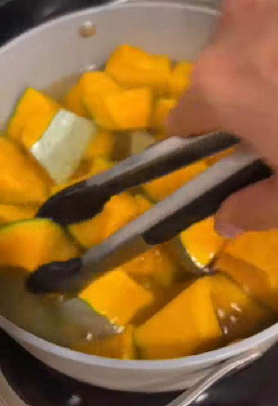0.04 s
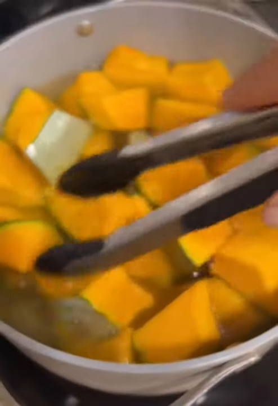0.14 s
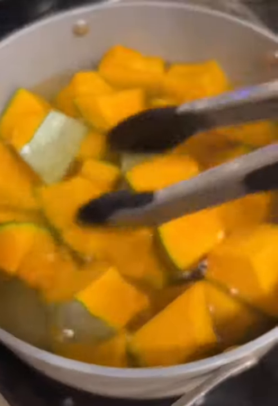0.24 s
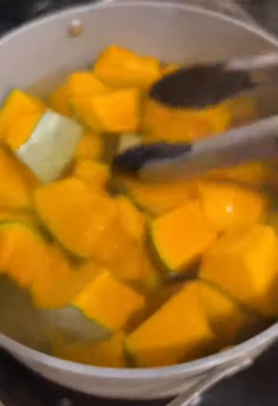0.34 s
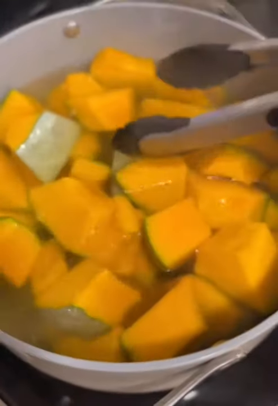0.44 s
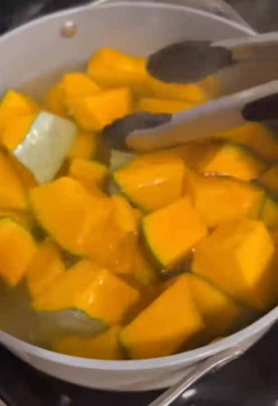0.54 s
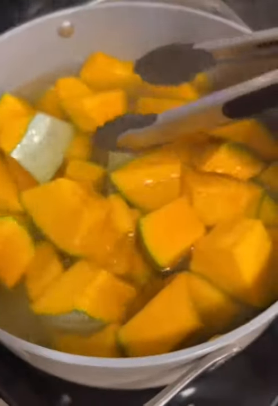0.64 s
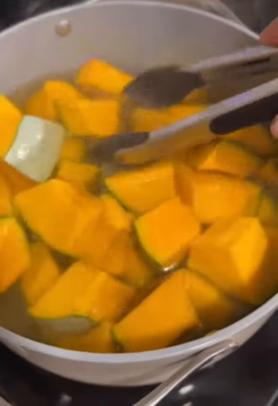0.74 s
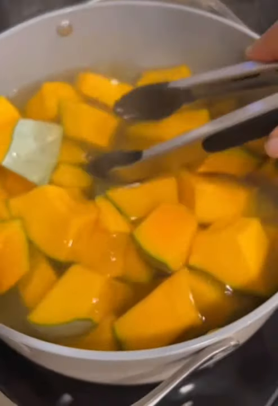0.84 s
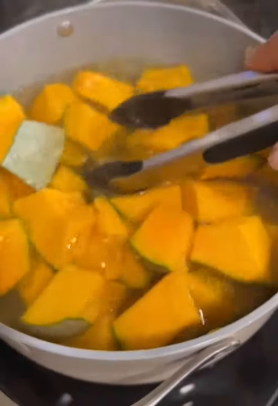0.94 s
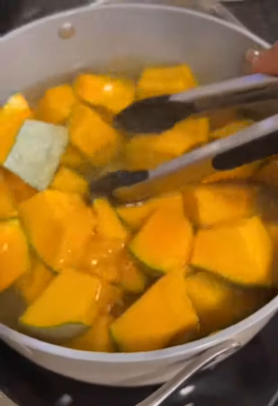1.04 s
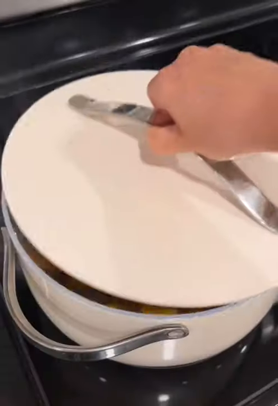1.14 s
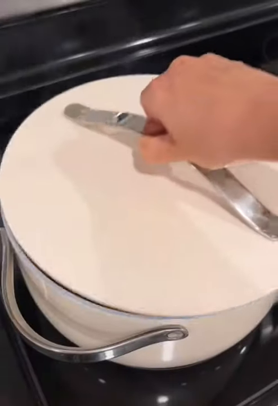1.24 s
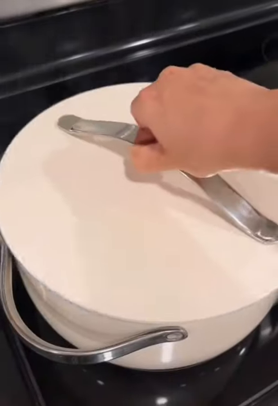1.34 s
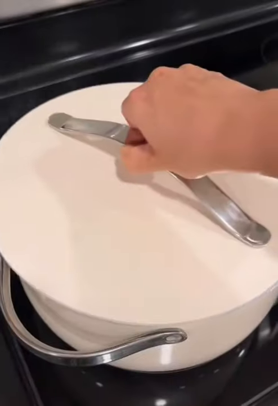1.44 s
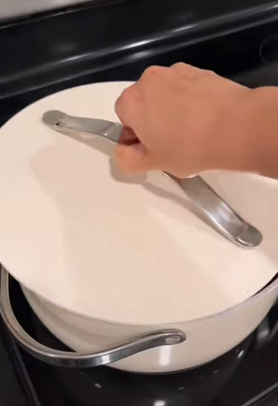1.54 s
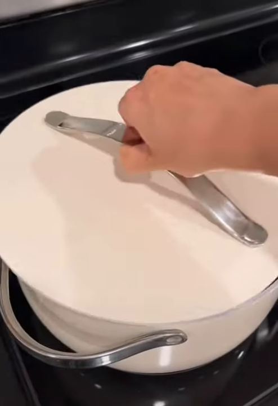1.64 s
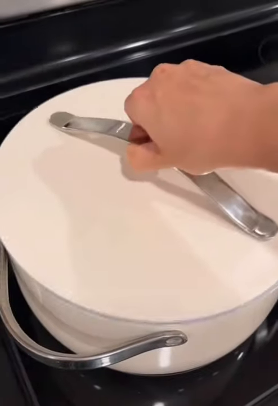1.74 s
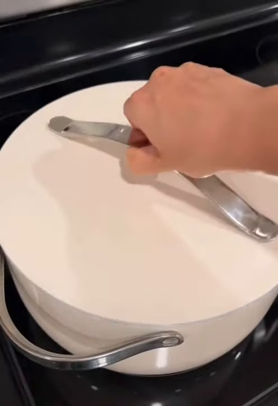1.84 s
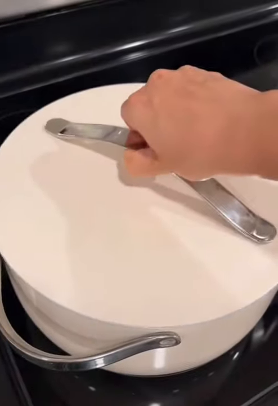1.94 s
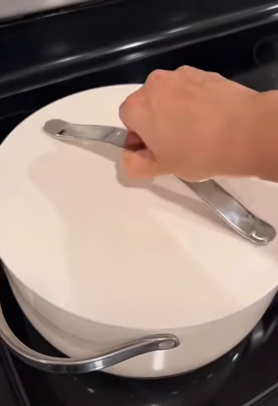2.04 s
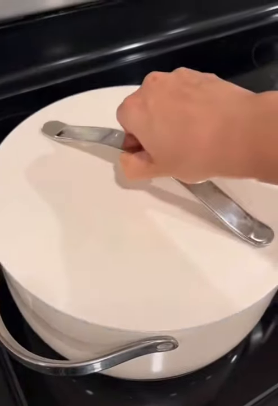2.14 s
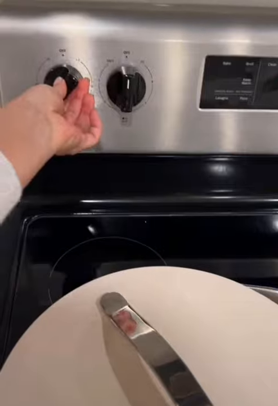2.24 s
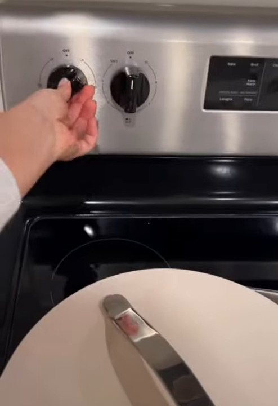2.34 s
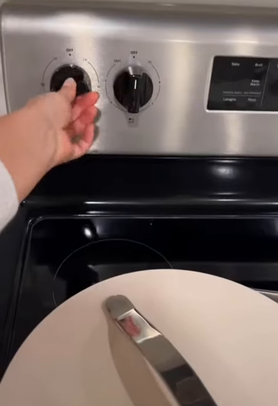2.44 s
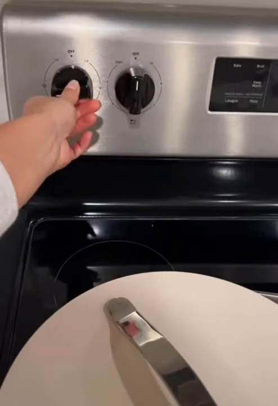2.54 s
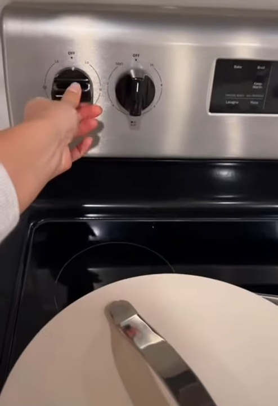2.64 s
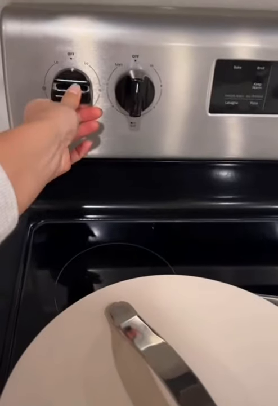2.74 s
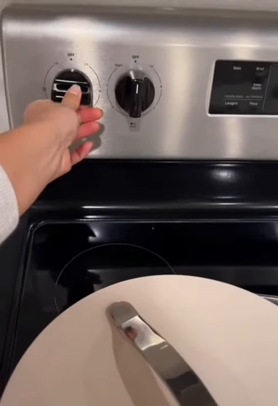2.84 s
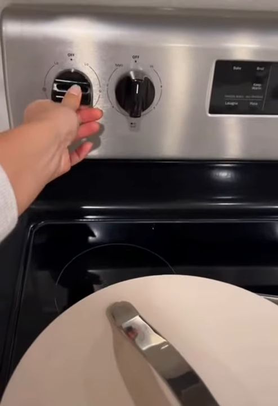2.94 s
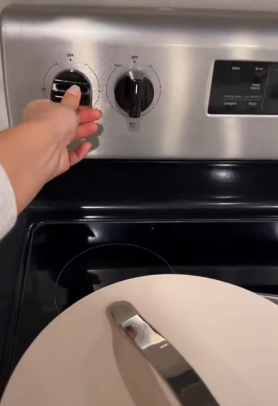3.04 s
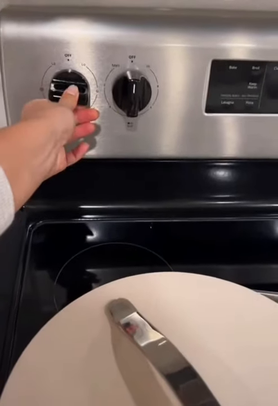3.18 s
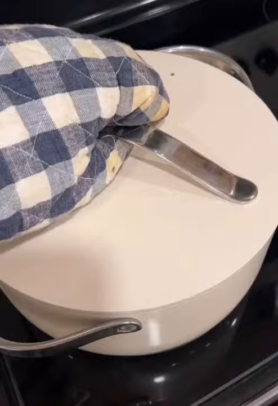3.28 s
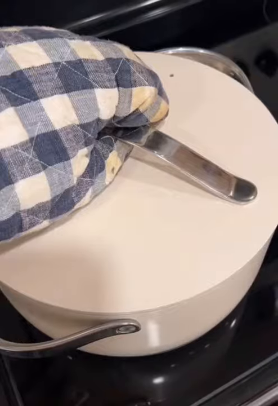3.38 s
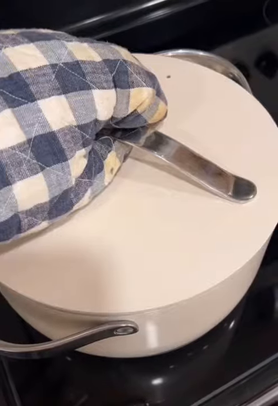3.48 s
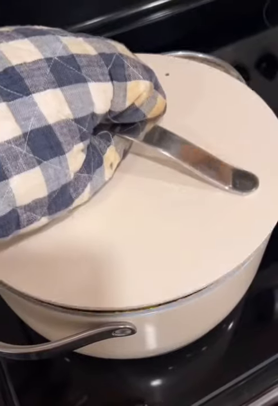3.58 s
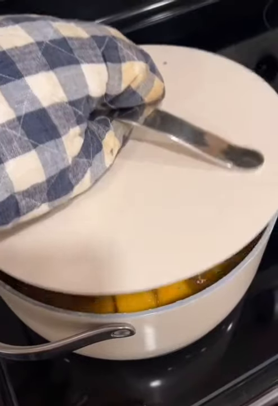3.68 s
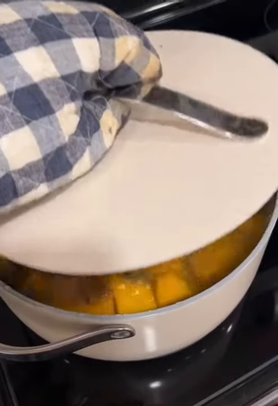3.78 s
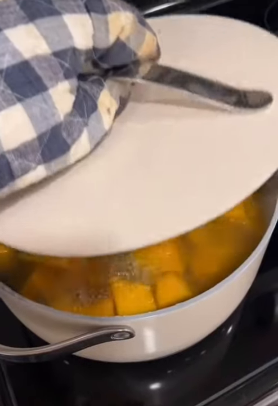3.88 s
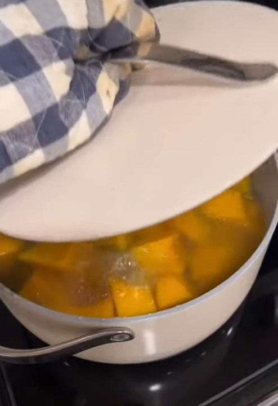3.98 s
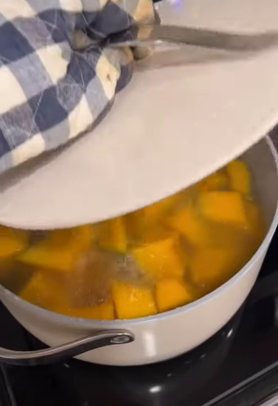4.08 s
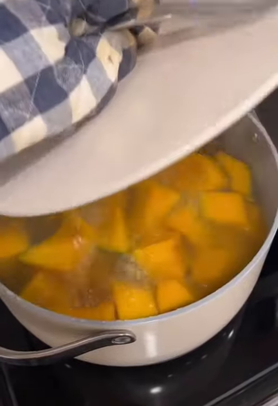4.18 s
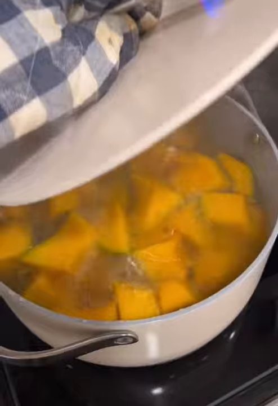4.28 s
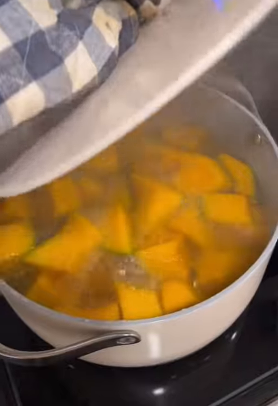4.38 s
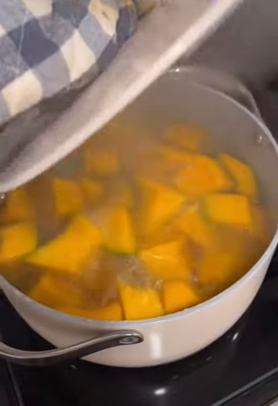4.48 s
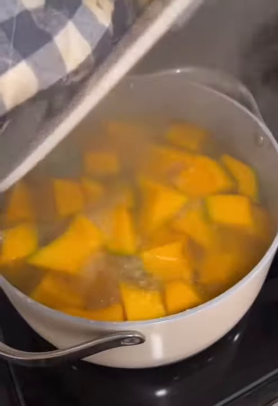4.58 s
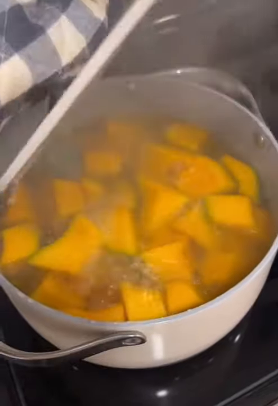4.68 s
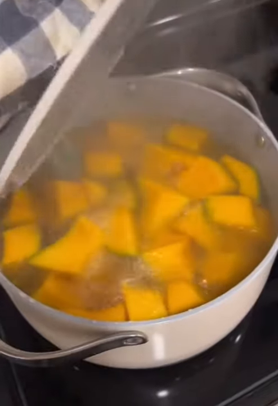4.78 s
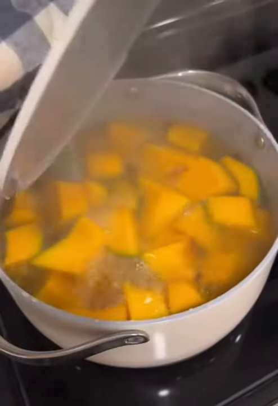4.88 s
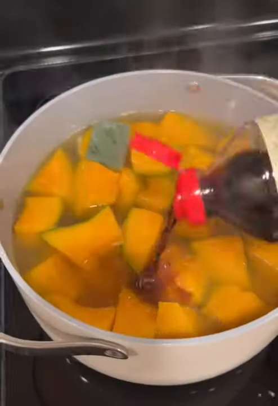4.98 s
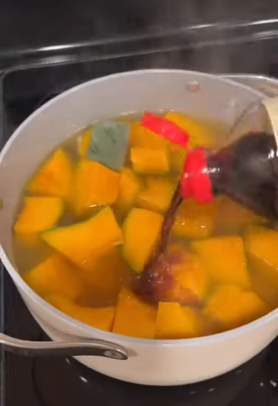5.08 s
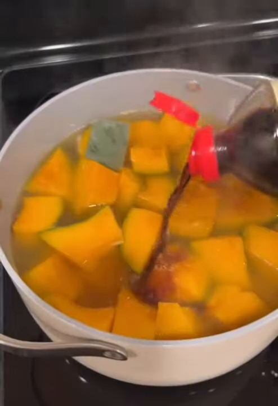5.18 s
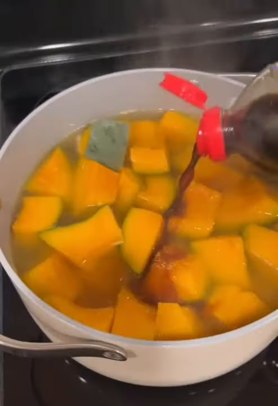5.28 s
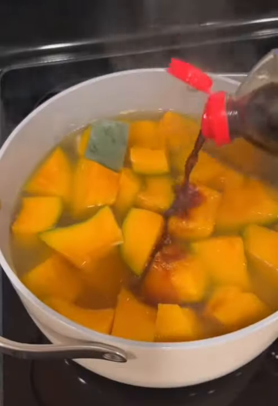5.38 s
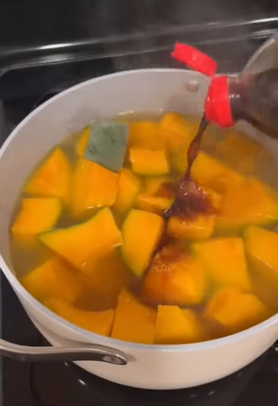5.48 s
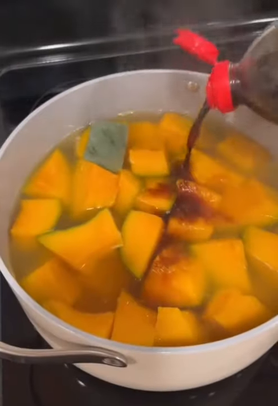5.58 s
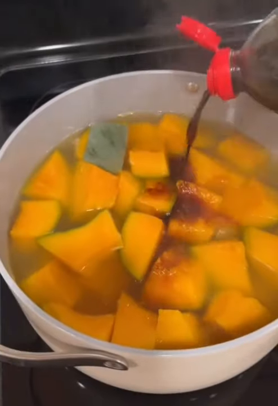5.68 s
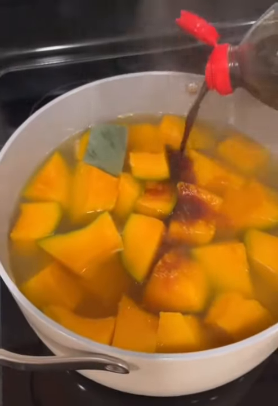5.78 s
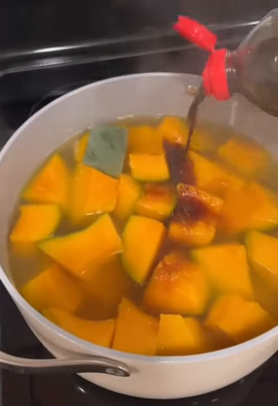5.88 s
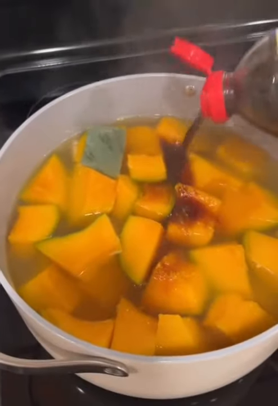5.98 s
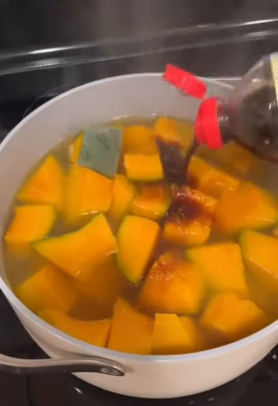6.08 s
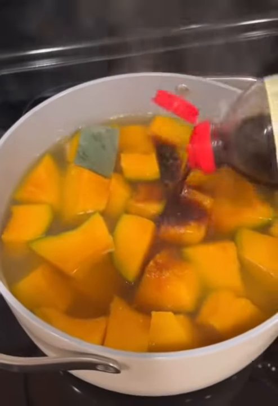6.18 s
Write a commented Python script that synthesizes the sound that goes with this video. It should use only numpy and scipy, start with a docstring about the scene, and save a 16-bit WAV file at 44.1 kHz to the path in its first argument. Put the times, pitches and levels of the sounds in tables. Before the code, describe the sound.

Five short moments at a stove are heard from close up, joined by quick cuts over a low, steady fan hum. First come light ticks of tongs. The loudest sound follows: a lid clanging and scraping onto a metal pot until its ringing is damped. After a quiet knob click, steam escapes, drops fall and a burst of sizzling breaks out. Small crackles from a plastic sauce bottle end the sequence.

```python
"""A lid clangs onto a pot: each blow cracks and rings both, then the rims grind and damp the ringing.
It is the second of five short moments at a stove. First, tongs tick in the simmering pot. After the lid,
a knob clicks round; the lid lifts, steam escapes, drops fall and sizzle on hot metal; a plastic bottle
crackles and glugs as sauce is poured. An extractor fan rumbles and hums throughout."""
import sys
import numpy as np
from scipy import signal
from scipy.fft import rfft, irfft
from scipy.io import wavfile
from scipy.ndimage import uniform_filter1d

SR = 44100
rng = np.random.default_rng(int(sys.argv[2]) if len(sys.argv) > 2 else 0)


def pcm_store(signal):
    """Save signal as 16-bit PCM."""
    levels = np.round(np.clip(np.atleast_2d(signal), -1, 1) * 32767)
    wavfile.write(sys.argv[1], SR, levels.astype(np.int16).T)


N = 274302
TIME_S = np.arange(N) / SR
BASS_HZ, TREBLE_HZ = (40, 800), (1500, 12000)

# joins between moments: time_s
JOINS_S = [1.156, 2.207, 3.307, 4.997]
SPANS_S = list(zip([0] + JOINS_S, JOINS_S + [N / SR]))
STIR_S, LID_DOWN_S, KNOB_S, LID_UP_S, POUR_S = SPANS_S
# background per moment: fan_db, hum_db, air_db, start_offset_db, settle_s
BACKGROUND = [(-48.5, -55, -67, 0.5, .1), (-51.5, -58.5, -75.5, 4, .1), (-51, -62.5, -72.5, -3.5, 0.033),
              (-54.5, -54.5, -75, -21.5, 0.12), (-58.5, -57, -70, -6.5, 0.2)]
# fan spectra (near, lid lifted, far): freq_hz, density_db
FAN_NEAR = [(15, -41.5), (25, -11), (43, -2), (80, -2), (113, -2), (146, -5), (220, 1.5), (270, -13),
            (356, 2.5), (388, -12.5), (484, -2.5), (694, -17.5), (1500, -38), (1950, -72.5), (3300, -120)]
FAN_LID_UP = [(15, -55), (25, -24), (43, -15), (90, 3), (119, 6.5), (146, -9), (375, -4.5), (510, -2),
              (867, -43), (1240, -12), (1500, -30), (1950, -57), (3300, -120)]
FAN_FAR = [(15, -51), (25, -5), (59, -2), (87, -17), (102, -2), (123, -12), (151, -17.5), (575, -30),
           (769, -29), (994, -39), (1500, -35), (1950, -61), (3300, -120)]
# treble background spectra: freq_hz, density_db
SIMMER_SPECTRUM = [(410, -35), (700, -1.5), (1160, -2), (1470, -10.5), (1770, -6.5), (3140, -12.5),
                   (5790, -15), (10100, -17), (11700, -16.5), (13700, -43), (15800, -26)]
AIR_SPECTRUM = [(500, -3), (800, -5.5), (1500, -5.5), (2400, -7), (3700, -14), (4300, -18), (8000, -22.5),
                (12000, -39), (16000, -50)]
RUSTLE_SPECTRUM = [(180, -44), (300, -20), (1400, -19), (1600, -8), (2550, -3), (3060, -8.5), (3790, -7.5),
                   (8270, -12.5), (11500, -19), (15800, -15)]

# tong ticks: start_s, level_db, centre_hz, width_oct
TONG_TICKS = [(.159, -47.5, 6800, 2.1), (.458, -65, 1200, 0.5), (0.73, -41.5, 6000, 7.8),
              (0.849, -48, 7200, 0.24), (.878, -53.5, 6500, .3), (1.064, -44.5, 4890, 1.06)]
# knocks and short rings: start_s, level_db, pitch_hz, t60_s
KNOCKS = [(.738, -23, 198, 0.018), (.765, -35.5, 150, 0.044), (1.267, -13.5, 495, 0.082),
          (2.35, -35.5, 218, 0.043), (3.427, -41.5, 332, 0.042), (3.503, -36, 192, .053),
          (3.525, -35, 299, 0.053), (3.6, -46, 603, 0.16), (4.297, -30.5, 1940, 0.11),
          (4.297, -30.5, 3280, 0.12), (4.307, -28.5, 828, 0.042), (4.31, -36.5, 117, 0.11),
          (4.325, -36, 343, 0.15), (4.461, -33, 122, 0.11), (4.458, -15, 870, 0.0083),
          (4.465, -16, 418, 0.016), (5.525, -45.5, 545, 0.018), (5.811, -38.5, 1414, 0.0087),
          (6.037, -30, 1300, 0.0045), (6.07, -41.5, 1060, 0.014)]

# free pot wall modes: pitch_hz; level_db, t60_s
POT_HZ = [328, 655, 1125, 1287, 1487, 2050, 2780, 3862, 4290, 4856, 5265, 5992, 6309, 6998, 8295, 9378,
          10780]
POT_MODES = [(-15, 0.066), (-1, 2.7), (-16.5, 0.26), (-10.5, 0.17), (-5, 1.2), (-18, 0.22), (-3.5, 0.33),
             (-12, 0.25), (-18.5, .18), (-26, 0.21), (-23, 0.35), (-28.5, 0.26), (-32, .25), (-33.5, 0.34),
             (-33.5, 0.28), (-37.5, .2), (-36.5, 0.25)]
# hand-held lid modes: pitch_hz; level_db, t60_s
LID_HZ = [587, 2519, 3655, 3801, 4326, 4856, 5992, 6718, 7752, 8035, 9130, 9800, 10510, 10990]
LID_MODES = [(-19.5, 1.2), (-2.5, 0.51), (-17.5, 1.4), (-10, .45), (-17.5, 0.4), (-18, 0.72), (-13, 0.47),
             (-10, 0.29), (-16, 0.28), (-27.5, .5), (-26.5, 0.37), (-30.5, .3), (-20.5, 0.13),
             (-26.5, 0.27)]
# modes of lid and pot, rim on rim: pitch_hz; level_db, t60_s
SHUT_HZ = [118, 350, 576, 1184, 1505, 1561, 1986, 2557, 2622, 2810, 3278, 3898, 4328, 4899, 5286, 5464,
           6008, 6239, 6438, 7752, 8070, 8306, 9130, 10420]
SHUT_MODES = [(-10.5, 0.53), (-10, 0.35), (-10, .28), (-7, 0.16), (-0.5, 0.15), (-17, 0.42), (-13.5, 0.12),
              (4.5, 0.079), (-15.5, 0.29), (-3.5, 0.39), (-23.5, 0.13), (0.5, 0.11), (-20.5, 0.74),
              (-17.5, 0.24), (-13.5, 0.2), (-25.5, 0.41), (-24, 0.26), (-11, 0.28), (-27, .3), (-31, 0.44),
              (-19.5, 0.16), (-23, 0.34), (-32, 0.082), (-31.5, 0.15)]
# drum modes of lid middle and stove top: pitch_hz; level_db, t60_s
DRUM_HZ = [104, 160, 311, 490]
DRUM_MODES = [(-22.5, 1), (-18.5, .3), (-2, 0.16), (-9.5, 0.16)]
BODIES = (POT_HZ, POT_MODES), (LID_HZ, LID_MODES), (SHUT_HZ, SHUT_MODES), (DRUM_HZ, DRUM_MODES)
# lid meets rim: start_s, crack_db, seated_fraction, lid_db, drum_db, hardness_db_per_oct
BLOWS = [(1.168, -11, 0.1, -24.5, -33.5, -2), (1.267, -13, 0.26, -20, -31.5, 2),
         (1.288, -23, 0, -22, -37, 0.5), (1.325, -27, 0.05, -29, -35.5, 0.5),
         (1.349, -11, 0.34, -18, -29.5, 3), (1.368, -19, 0.16, -10, -25, -4.5),
         (1.384, -18, 0.4, -27, -11, 4), (1.429, -23, 0.2, -32.5, -32.5, 0.5),
         (1.708, -8.5, 1, -18.5, -13.5, -5), (1.728, -19.5, 0.7, -29, -19, -7.5),
         (1.739, -25, .6, -32.5, -20.5, -20.5), (1.81, -26, 0.9, -49, -15.5, -10),
         (1.882, -9, 1, -34.5, -25.5, -1), (1.895, -11.5, 0.88, -38.5, -27.5, -0.5)]
# contact crack spectrum: freq_hz, density_db
CRACK_SPECTRUM = [(60, -41.5), (150, -19), (350, -7), (800, -6.5), (1500, 1.5), (2800, -8.5), (4500, -10),
                  (8000, -23), (12000, -40.5), (16000, -58)]
# damping by rim contact: start_s, end_s, pot_db_per_s, lid_db_per_s
RIM_DAMPING = [(1.274, 1.4, 184.5, 64.5), (1.408, 1.47, 329, 271.5), (1.711, 2.2, 289, 209.5)]
# rims grinding: start_s, level_db, hold_s, fall_db_per_s
GRINDS = [(1.27, -35, .12, 129), (1.535, -47, .01, 65), (1.716, -28.5, .003, 353),
          (1.878, -35, .015, 239.5)]
# grinding spectrum: freq_hz, density_db
GRIND_SPECTRUM = [(40, -30), (100, -16.5), (400, 3.5), (900, -11.5), (2000, -12.5), (4000, -16.5),
                  (8000, -27.5), (12000, -51), (16000, -84)]

# knob push and click: start_s, level_db, centre_hz, width_oct, t60_s
KNOB_CLICKS = [(2.288, -51.5, 2330, 0.37, .074), (2.532, -46.5, 3510, 0.28, 0.037),
               (2.534, -50, 6160, .23, .044), (2.536, -45.5, 8150, 0.42, 0.08),
               (2.54, -53, 4500, 3.5, 0.31)]
# drops from the lid, spits on hot metal, bottle crackles: start_s, level_db, centre_hz
DRIPS = [(3.525, -56, 1190), (3.72, -54, 2990), (3.761, -50, 2800), (3.8, -57, 2500), (3.845, -50, 1800),
         (4.041, -44.5, 1390), (4.089, -49, 1183), (4.156, -40, 2520), (4.2, -40, 2210), (4.24, -44, 990)]
SPITS = [(4.303, -32, 3200), (4.325, -25, 3860), (4.457, -35, 2000), (4.522, -25, 2950)]
CRACKLES = [(5.141, -48, 4000), (5.16, -46.5, 4700), (5.184, -43.5, 2964), (5.204, -43, 3980),
            (5.221, -50, 3000), (5.291, -56.5, 5020), (5.585, -46, 4940), (5.608, -43.5, 2450),
            (5.809, -45.5, 1994), (5.887, -42.5, 3510), (5.968, -50.5, 2260), (5.995, -48, 1100),
            (6.01, -51, 2300), (6.037, -35.5, 1340), (6.07, -31, 3740), (6.095, -42.5, 6000)]
# steam, rumble, sizzle and finger-slip swells: peak_s, level_db, hold_s, fall_db_per_s
STEAM_SWELLS = [(3.68, -59.5, 0.74, 300)]
RUMBLE_SWELLS = [(4.34, -51, 0.45, 80)]
SIZZLE_SWELLS = [(4.304, -32.5, 0.039, 222), (4.46, -27, 0.0027, 502), (4.53, -34.5, 0.4365, 500)]
SLIP_SWELLS = [(5.132, -58.5, 0.058, 300), (5.215, -49, 0.0029, 1200), (5.29, -68, 0.037, 300),
               (5.452, -59.5, 0.0021, 280), (5.588, -54, 0.0019, 387), (5.808, -60, .002, 420),
               (5.892, -61, 0.011, 65), (6.036, -49.5, .001, 670), (6.068, -55.5, .002, 240)]
# steam, sizzle and finger-slip spectra: freq_hz, density_db
STEAM_SPECTRUM = [(410, -46), (700, 5), (862, -13), (1240, -9.5), (1990, -8.5), (2900, -5.5),
                  (11600, -10.5), (13300, -10.5), (13900, -47), (14400, -49), (15800, -28)]
SIZZLE_SPECTRUM = [(90, -24), (150, -3.5), (500, -5.5), (1100, -2), (1600, -9), (2000, -1.5), (2900, -5.5),
                   (5600, -4.5), (6250, 1.5), (6900, -3.5), (8000, -5), (12200, -14), (13200, -28),
                   (14000, -58), (16000, -64.5)]
SLIP_SPECTRUM = [(2000, -28), (5000, -9), (8000, -5), (11000, 3), (13000, -3), (13800, -20), (15800, -26)]

# left-right likeness of noise: freq_hz, correlation
STEREO_CORRELATION = [(60, 0.97), (180, 1), (550, 0.89), (1650, 0.97), (4970, 0.52), (15000, 0.92)]
# kitchen decay: freq_hz, t60_s
KITCHEN_T60 = [(100, 0.91), (500, 0.59), (2000, 0.42), (6000, 0.22), (12000, 0.033)]


def gain_of(db):
    return 10 ** (np.asarray(db) / 20)


def curve_at(points, hz):
    freq_hz, value = np.transpose(points)
    return np.interp(np.log(hz + 1), np.log(freq_hz + 1), value)


def add(mix, start_s, sound):
    part = mix[..., round(start_s * SR):][..., :sound.shape[-1]]
    part += sound[..., :part.shape[-1]]


def noise(size, spectrum, band_hz, patchy_db=1.5, flicker_db=0.):
    """Stereo noise with drifting patches; unit rms in band_hz before flicker."""
    hz = np.fft.rfftfreq(1024, 1 / SR)
    a, b, c, d, patches = rng.standard_normal((size // 256 + 5, 513, 5)).T
    patches = uniform_filter1d(uniform_filter1d(patches, size=10, axis=0), size=10, axis=1) * 10
    same = curve_at(STEREO_CORRELATION, hz)[:, None]
    left = a + 1j * b
    right = same * left + np.sqrt(1 - same ** 2) * (c + 1j * d)
    bins = np.array([left, right]) * gain_of(curve_at(spectrum, hz)[:, None] + patchy_db * patches)
    band_bins = bins * ((hz > band_hz[0]) & (hz < band_hz[1]))[:, None]
    full, band = (signal.istft(z, nperseg=1024, noverlap=768)[1][:, :size] for z in (bins, band_bins))
    flicker = uniform_filter1d(rng.standard_normal(size), size=100) * 10
    return full * gain_of(flicker_db * flicker) / np.std(band)


def noise_layer(level, span_s, spectrum, band_hz, **texture):
    """Noise following a level curve within one moment."""
    out = np.zeros((2, N))
    start_s, end_s = span_s
    part = level[round(start_s * SR):round(end_s * SR)]
    add(out, start_s, noise(len(part), spectrum, band_hz, **texture) * part)
    return out


def background_level(column, settles=True):
    """One level per moment, optionally settling from a start offset."""
    moment = np.searchsorted(JOINS_S, TIME_S)
    rows = np.array(BACKGROUND)[moment]
    since_s = TIME_S - np.array([0] + JOINS_S)[moment]
    offset_db = rows[:, 3] * np.exp(-since_s / rows[:, 4])
    return gain_of(rows[:, column] + settles * offset_db)


def swells(rows, rise_s, tail_db, tail_db_per_s):
    """Level curve: each swell climbs 40 dB in rise_s, holds, then falls no lower than its tail."""
    level = np.zeros(N)
    for peak_s, db, hold_s, fall_db_per_s in rows:
        late_s = np.maximum(TIME_S - peak_s - hold_s, 0)
        onset_db = -40 * np.clip((peak_s - TIME_S) / rise_s, 0, 3)
        decay_db = np.maximum(-fall_db_per_s * late_s, tail_db - tail_db_per_s * late_s)
        level = np.maximum(level, gain_of(db + onset_db + decay_db))
    return level


def ticks(rows):
    """Decaying noise bursts: start_s, level_db, centre_hz, width_oct, t60_s."""
    out, t = np.zeros(N), np.arange(8192) / SR
    hz = np.fft.rfftfreq(len(t), 1 / SR) + 1
    for start_s, db, centre_hz, width_oct, t60_s in rows:
        shape = np.exp(-(np.log2(hz / centre_hz) / width_oct) ** 2 / 2) / (1 + (hz / 12000) ** 8)
        burst = irfft(rfft(rng.standard_normal(len(t))) * shape)
        envelope = gain_of(db - 60 * t / t60_s) * np.minimum(t / 0.00026, 1)
        add(out, start_s, burst / burst.std() * envelope)
    return out


def fan_rumble():
    """Low extractor fan noise, shaped per moment."""
    level = background_level(column=0)
    spectra = FAN_NEAR, FAN_NEAR, FAN_NEAR, FAN_LID_UP, FAN_FAR
    return sum(noise_layer(level, span, spectrum, BASS_HZ) for span, spectrum in zip(SPANS_S, spectra))


def fan_hum(pitch_hz=118.5, width_hz=5.8):
    """Twice mains frequency, wavering in level and phase."""
    pole = np.exp(-np.pi * width_hz / SR)
    waver = signal.lfilter([1], [1, -pole], rng.standard_normal(N) + 1j * rng.standard_normal(N))
    tone = ((1.9 + waver / waver.std()) * np.exp(2j * np.pi * pitch_hz * TIME_S)).real
    return tone / tone.std() * background_level(column=1)


def air(band_hz=(1500, 6000)):
    """Faint treble bed: simmer, then plain hiss, then rustle."""
    level = background_level(column=2, settles=False)
    spectra = SIMMER_SPECTRUM, AIR_SPECTRUM, AIR_SPECTRUM, AIR_SPECTRUM, RUSTLE_SPECTRUM
    return sum(noise_layer(level, span, spectrum, band_hz) for span, spectrum in zip(SPANS_S, spectra))


def tongs(t60_s=0.05):
    """Tongs tick while stirring the pot."""
    return ticks((*row, t60_s) for row in TONG_TICKS)


def knocks(rise_per_t60=0.037):
    """Each knock rings one damped sine."""
    out, t = np.zeros(N), np.arange(8192) / SR
    for start_s, db, pitch_hz, t60_s in KNOCKS:
        ring = gain_of(db - 60 * t / t60_s) * np.sin(2 * np.pi * pitch_hz * t)
        add(out, start_s, ring * np.minimum(t / (rise_per_t60 * t60_s), 1))
    return out


def strike(body, t, hardness_db_per_oct):
    """A round body rings in close, beating mode pairs; hard blows favour high modes."""
    pitch_hz, modes = body
    hz = np.array(pitch_hz)[:, None]
    db, t60_s = np.array(modes).T[:, :, None]
    pairs = np.sin(2 * np.pi * hz * t) + 0.091 * np.sin(2 * np.pi * hz * 1.005 * t)
    tilt_db = hardness_db_per_oct * np.log2(1 + hz / 1500)
    early = 1 + 0.51 * np.exp(-t / 0.019)  # energy first sits where the blow landed
    return early * np.sum(gain_of(db + tilt_db - 60 * t / t60_s) * pairs, axis=0)


def lid_blows(flutter_depth=0.67, flutter_samples=200, crack_t60_s=0.041, contact_s=0.003):
    """Each blow cracks and rings four bodies; rim contact damps pot and lid."""
    out, t = np.zeros(N), np.arange(26000) / SR
    pot, lid, shut, drum = BODIES
    attack = np.sin(np.pi / 2 * np.minimum(t / contact_s, 1)) ** 2
    fade = np.minimum((t[-1] - t) / .1, 1)
    for start_s, crack_db, seated, lid_db, drum_db, hardness in BLOWS:
        # seating moves the ring from the free pot to the shut pair
        pot_db = crack_db + np.interp(seated, (0, 1), (6, -31))
        shut_db = crack_db + np.interp(seated, (0, 1), (-26.5, -5.5))
        touch_s = [np.clip(start_s + t, max(on_s, start_s), max(off_s, start_s)) - max(on_s, start_s)
                   for on_s, off_s, _, _ in RIM_DAMPING]
        pot_loss_db, lid_loss_db = np.transpose(RIM_DAMPING)[2:] @ touch_s
        flutter = uniform_filter1d(rng.standard_normal(len(t)), flutter_samples)
        flutter = uniform_filter1d(flutter, flutter_samples)
        chatter = 1 + flutter_depth * flutter / flutter.std()
        sound = gain_of(pot_db - pot_loss_db) * strike(pot, t, hardness)
        sound += gain_of(lid_db - lid_loss_db) * strike(lid, t, hardness)
        sound += gain_of(shut_db) * strike(shut, t, hardness) * chatter
        sound += gain_of(drum_db) * strike(drum, t, 0)
        crack = noise(3000, CRACK_SPECTRUM, (0, SR))[0]
        sound[:3000] += crack * gain_of(crack_db - 60 * t[:3000] / crack_t60_s)
        add(out, start_s, sound * attack * fade)
    return out


def rim_rattle(grind_level, taps_per_s=600, damping_t60_s=0.19):
    """Grinding rims tap pot and lid lightly, keeping their modes alive."""
    t = np.arange(6000) / SR
    taps = rng.standard_normal(N) * (rng.random(N) < taps_per_s / SR) * grind_level
    ring = sum(gain_of(db) * strike(body, t, hardness)
               for body, db, hardness in zip(BODIES[:3], (-5, -1.5, -5), (1.5, -.8, -.6)))
    envelope = gain_of(-60 * t / damping_t60_s) * np.minimum(t / 0.00088, 1)
    return signal.oaconvolve(taps, ring * envelope)[:N]


def rim_grind(grind_level):
    """Rim scrapes on rim."""
    return noise_layer(grind_level, LID_DOWN_S, GRIND_SPECTRUM, band_hz=(750, 1050), patchy_db=3)


def panel_whine(pitch_hz=3660, level_db=-81.5):
    """Thin, unsteady tone near the control panel."""
    waver = 1 + 8 * uniform_filter1d(rng.standard_normal(N), size=1600)
    gate = (TIME_S > KNOB_S[0]) & (TIME_S < KNOB_S[1])
    return gain_of(level_db) * waver * np.sin(2 * np.pi * pitch_hz * TIME_S) * gate


def knob():
    """The knob is pushed in, then clicks round."""
    return ticks(KNOB_CLICKS)


def steam():
    """Steam escapes under the rising lid."""
    level = swells(STEAM_SWELLS, rise_s=0.51, tail_db=-30, tail_db_per_s=300)
    return noise_layer(level, LID_UP_S, STEAM_SPECTRUM, TREBLE_HZ, patchy_db=1.3, flicker_db=1.8)


def drips(width_oct=0.52, t60_s=.023):
    """Drops fall from the lid."""
    return ticks((*row, width_oct, t60_s) for row in DRIPS)


def open_pot_rumble():
    """The rumble swells while the pot stands open."""
    level = swells(RUMBLE_SWELLS, rise_s=0.37, tail_db=-30, tail_db_per_s=80)
    return noise_layer(level, LID_UP_S, FAN_LID_UP, BASS_HZ)


def sizzle():
    """Water runs off the lid and sizzles."""
    level = swells(SIZZLE_SWELLS, rise_s=0.021, tail_db=-7.5, tail_db_per_s=52)
    return noise_layer(level, LID_UP_S, SIZZLE_SPECTRUM, TREBLE_HZ, patchy_db=2.34, flicker_db=1.1)


def spits(width_oct=2.6, t60_s=0.065):
    """Splashes spit on hot metal."""
    return ticks((*row, width_oct, t60_s) for row in SPITS)


def finger_slips():
    """Fingers slip on the bottle."""
    level = swells(SLIP_SWELLS, rise_s=0.014, tail_db=-25, tail_db_per_s=48)
    return noise_layer(level, POUR_S, SLIP_SPECTRUM, band_hz=(7500, 13000), patchy_db=2, flicker_db=2)


def bottle_crackles(base_oct=0.4, oct_per_khz=0.47, t60_s=0.02):
    """Plastic crackles; higher crackles are wider in band."""
    return ticks((s, db, hz, base_oct + oct_per_khz * hz / 1000, t60_s) for s, db, hz in CRACKLES)


def bottle_glug(peak_s=5.848, level_db=-38, pitch_hz=108, sigma_s=.012):
    """One soft, low swell in the bottle."""
    envelope = gain_of(level_db) * np.exp(-((TIME_S - peak_s) / sigma_s) ** 2 / 2)
    return envelope * np.sin(2 * np.pi * pitch_hz * TIME_S)


def near_reflections(x, side_db=-4):
    """Direct sound plus nearby surfaces, which differ left to right, mostly in the treble."""
    response = np.diff(rng.standard_normal(900) * np.exp(-np.arange(900) / 250), 2)
    side = signal.oaconvolve(x, response / np.linalg.norm(response))[:N]
    return x + gain_of(side_db) * np.array([side, -side])


def kitchen_reverb(x):
    """Sparse echoes of random sign; each band decays at its own rate."""
    taps = np.zeros((3, SR // 2))  # shared, left, right
    grid = np.arange(150, SR // 2 - 20, 20)
    arrivals = grid + rng.integers(0, 20, (3, len(grid)))
    np.put_along_axis(taps, arrivals, rng.choice([-1., 1.], arrivals.shape), 1)
    hz, t, bins = signal.stft(taps, SR, nperseg=256)
    bins = bins * gain_of(-60 * t / curve_at(KITCHEN_T60, hz)[:, None])
    same = 1 / (1 + (hz[:, None] / 3000) ** 2)  # bass reaches both sides alike
    tail = signal.istft(np.sqrt(same) * bins[0] + np.sqrt(1 - same) * bins[1:], SR, nperseg=256)[1]
    return signal.fftconvolve(x[None], tail / np.linalg.norm(tail[0]), axes=1)[:, :N]


def scene():
    """Impacts with reflections; tones and noise beds without."""
    grind_level = swells(GRINDS, rise_s=.012, tail_db=-17.5, tail_db_per_s=55)
    clang = lid_blows() + rim_rattle(grind_level)
    clatter = tongs() + knocks() + knob() + drips() + spits() + bottle_crackles()
    mix = near_reflections(clang) + gain_of(-16.5) * kitchen_reverb(clang)
    mix *= TIME_S < LID_DOWN_S[1]  # the clang ends with its moment
    mix += near_reflections(clatter) + gain_of(-9.5) * kitchen_reverb(clatter)
    mix += fan_hum() + panel_whine() + bottle_glug()
    mix += fan_rumble() + air() + rim_grind(grind_level)
    return mix + steam() + open_pot_rumble() + sizzle() + finger_slips()


def record(dry, dip_s=0.019, ceiling=.95, cutoff_hz=15900):
    """Brief level dip at each join, soft clip, low-pass."""
    dips = np.prod([np.clip(abs(TIME_S - join_s) / dip_s, .2, 1) for join_s in JOINS_S], axis=0)
    dipped = dry * dips
    soft = dipped / (1 + (abs(dipped) / ceiling) ** 4) ** .25
    lowpass = signal.firwin(511, cutoff_hz, window=("kaiser", 9), fs=SR)
    return signal.oaconvolve(soft, lowpass[None], "same")


dry = scene()
out = record(dry)
pcm_store(out)
```